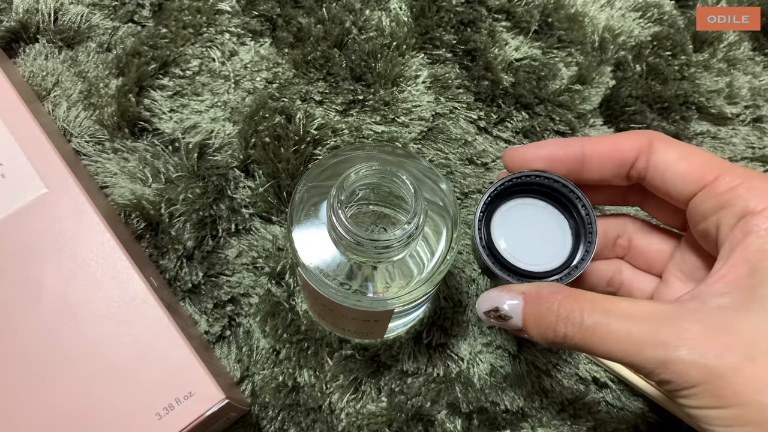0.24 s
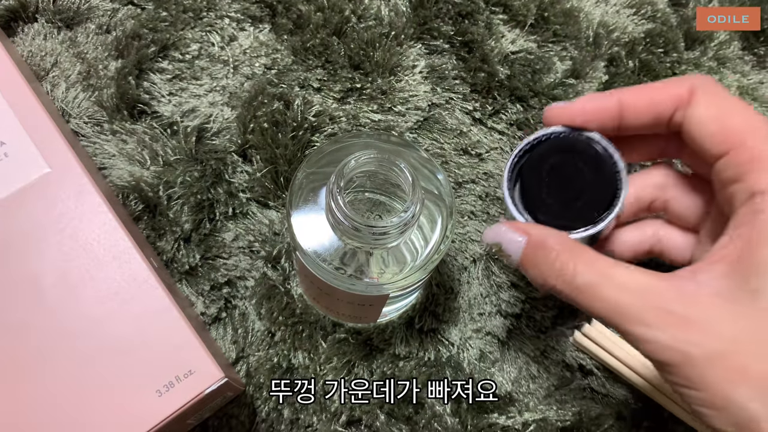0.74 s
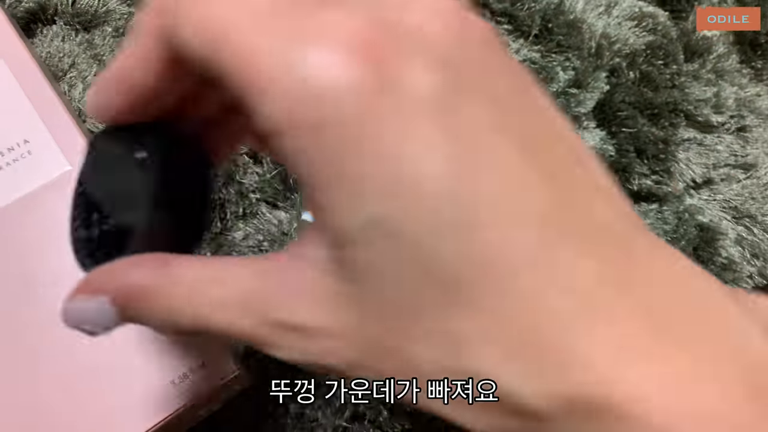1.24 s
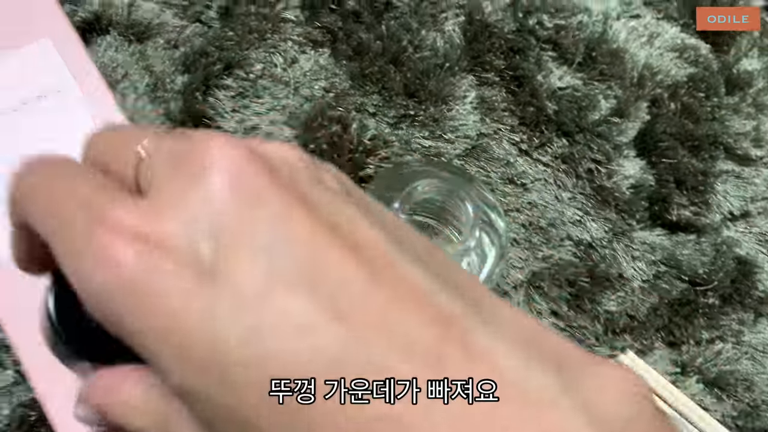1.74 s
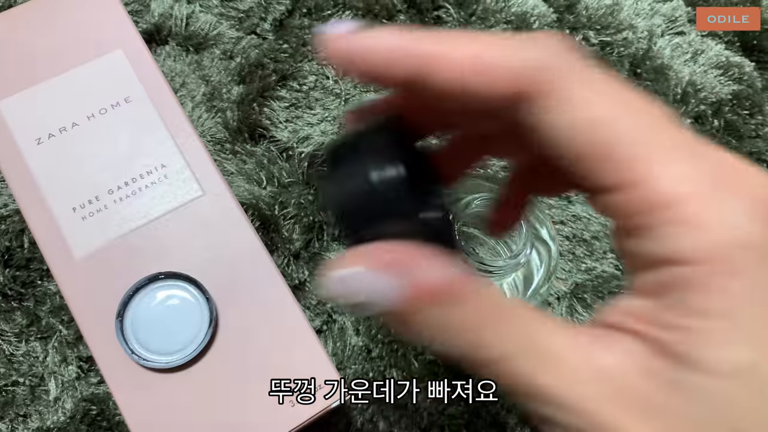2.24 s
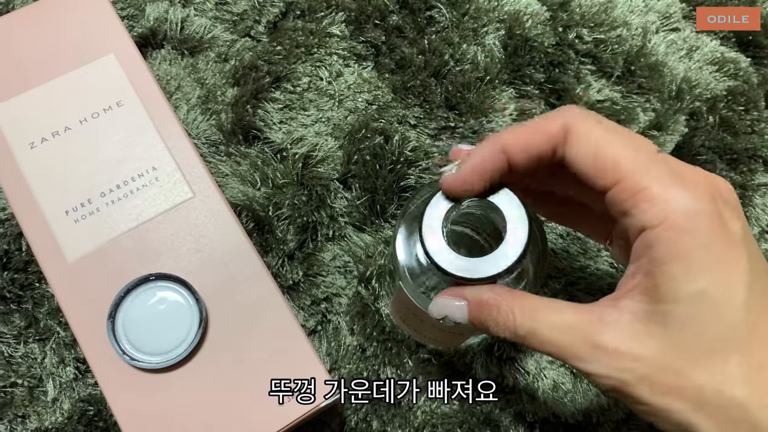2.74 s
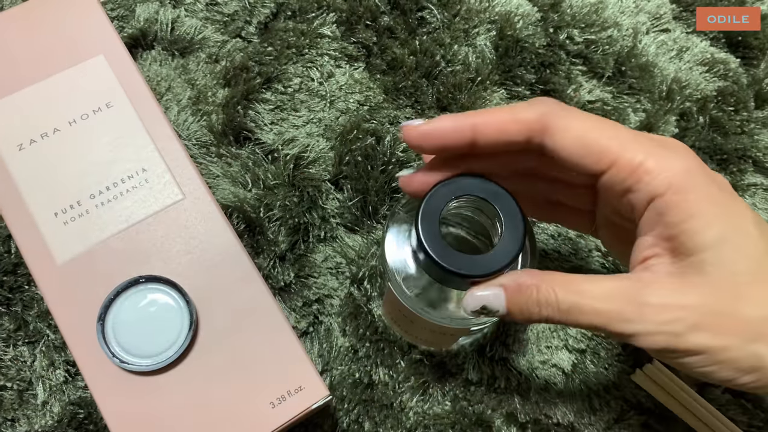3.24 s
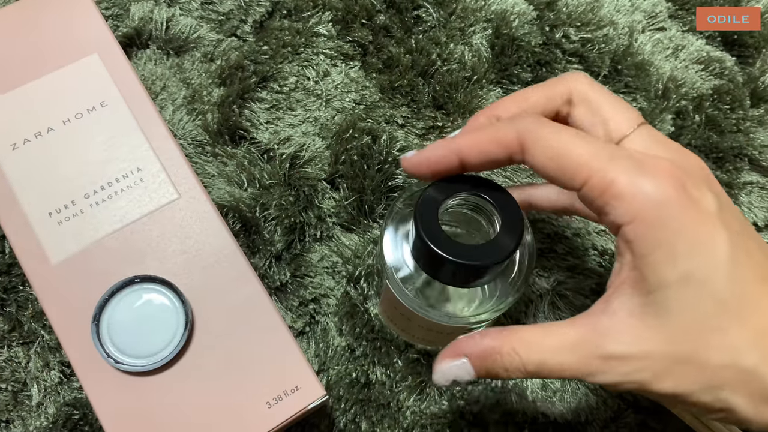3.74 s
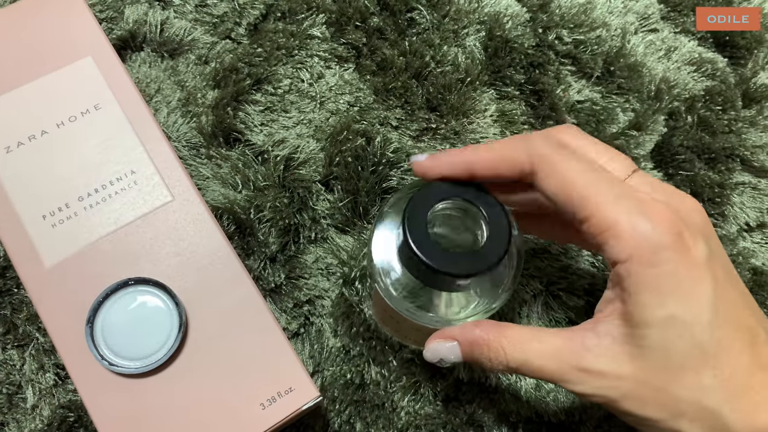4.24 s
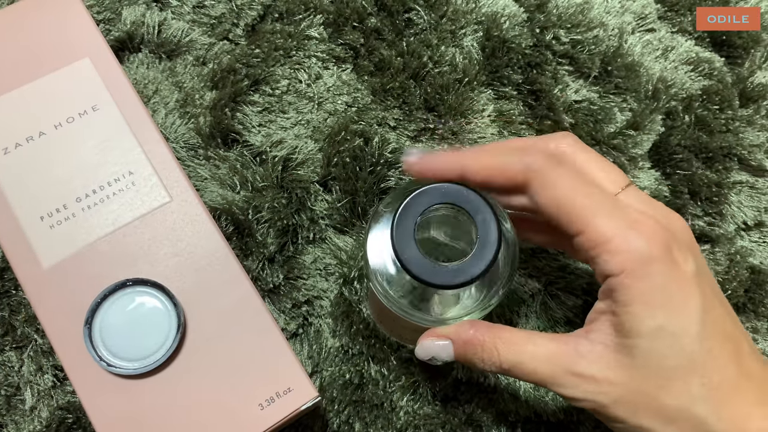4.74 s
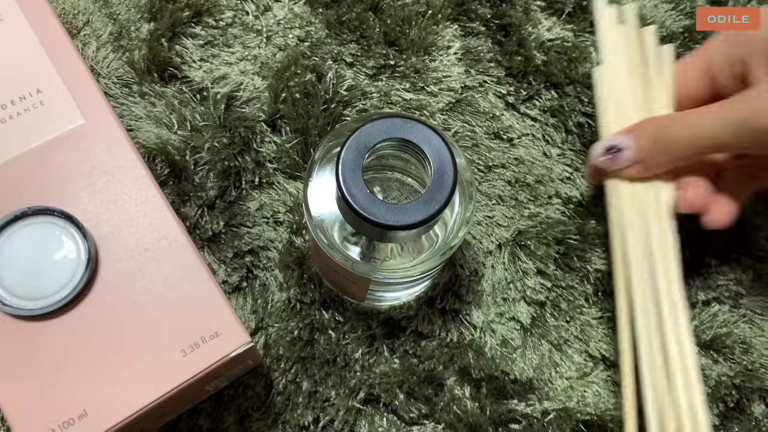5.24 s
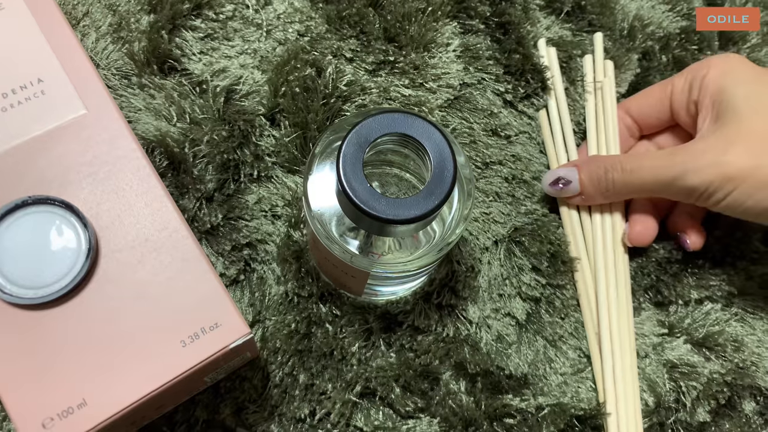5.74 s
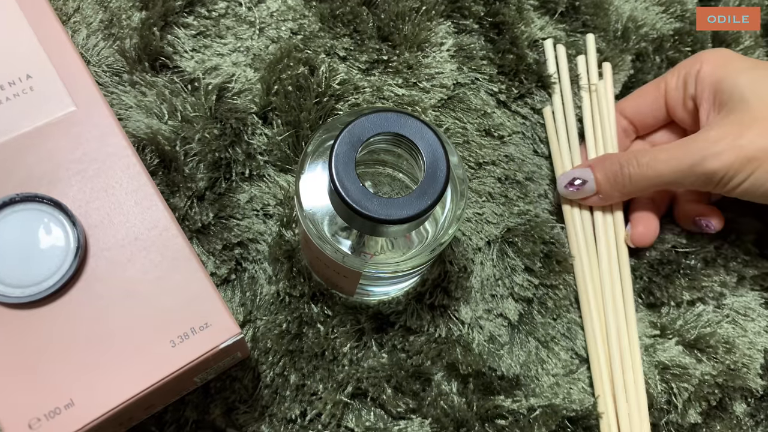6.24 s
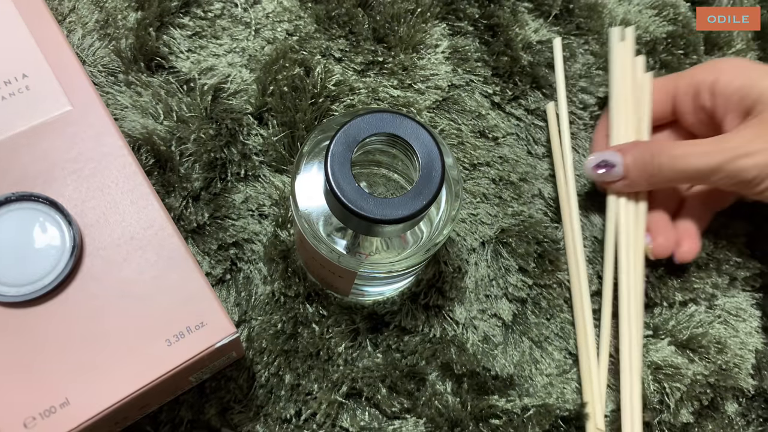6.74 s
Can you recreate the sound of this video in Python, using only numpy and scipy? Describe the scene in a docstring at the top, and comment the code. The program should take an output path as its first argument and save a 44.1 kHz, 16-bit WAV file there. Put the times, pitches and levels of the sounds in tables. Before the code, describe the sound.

Close plastic snaps, a scrape on a cardboard box, a plastic ring tapping and clinking on glass, then wooden sticks rustling faintly on a rug.

```python
"""Two sharp double snaps of a plastic cap, close to a pair of microphones in a small, quiet room.
A hand presses the cap onto a cardboard box, which knocks and rasps, then sets its ring on a filled
glass bottle: it thumps the air in the neck, slides and makes the glass clink. Last, thin wooden sticks
tick and rub as they are rolled together on a deep rug. Room air and a low mains hum lie underneath."""
import sys
import numpy as np
from scipy import signal
from scipy.fft import rfft, irfft
from scipy.io import wavfile
from scipy.ndimage import uniform_filter1d

SR = 44100
rng = np.random.default_rng(int(sys.argv[2]) if len(sys.argv) > 2 else 0)


def store_wav(level_fs):
    """Save 16-bit WAV to argv[1]."""
    pcm = np.round(np.clip(np.atleast_2d(level_fs), -1, 1) * 32767)
    wavfile.write(sys.argv[1], SR, pcm.T.astype(np.int16))


N = 308700

# modes of the plastic cap: (pitch [Hz], level [dB], t60 [s])
CAP_MODES = [(1340, 3.5, 0.0044), (2600, -10.5, .008), (4243, 4.5, 0.003), (6250, 0, 0.006),
             (7740, -13.5, 0.0023), (10800, -23, 0.0064), (13200, -42.5, 0.0033)]


def amp(db):
    """Decibels to gain."""
    return 10 ** (np.asarray(db) / 20)


def rms_one(x):
    """Scale to unit power."""
    return x / np.sqrt(np.mean(x ** 2) + 1e-20)


def band(x, low_hz, high_hz):
    """Band-pass with gentle slopes."""
    edges_hz = [low_hz, min(high_hz, .45 * SR)]
    return signal.sosfilt(signal.butter(2, edges_hz, "band", fs=SR, output="sos"), x)


def add(out, s, sound):
    """Mix a sound in at s seconds."""
    i = round(s * SR)
    out[i:i + len(sound)] += sound[:N - i]


def gain_curve(rows, column):
    """Smooth gain from a table of times and levels; silent outside it."""
    rows = np.array(rows)
    db = np.interp(np.arange(N) / SR, rows[:, 0], rows[:, column], left=-200, right=-200)
    return uniform_filter1d(amp(db), size=200)


def strokes(rows, column):
    """Gain of hand strokes: each climbs 30 dB over its swell time and drops 30 dB over its fade time."""
    t, out = np.arange(N) / SR, np.zeros(N)
    for row in rows:
        s, swell_s, fade_s = row[:3]
        near = slice(max(int((s - 2 * swell_s) * SR), 0), int((s + 2 * fade_s) * SR))
        away = np.maximum((s - t[near]) / swell_s, (t[near] - s) / fade_s)
        out[near] += amp(row[column] - 30 * away ** 1.16)   # the power rounds the top
    return out


def mode(hz, db, t60, rise_s, pressed=0.0):
    """A struck mode swells during the contact, then dies, ever faster if something presses on it."""
    t60 = max(t60, .003)
    t = np.arange(int(min(t60, .4) * SR)) / SR
    age = t / t60
    decay = amp(db - 60 * ((1.5 - pressed) * age + pressed * age ** 2))
    return decay * -np.expm1(-t / rise_s) * np.sin(2 * np.pi * hz * t)


def crack(db, t60, low_hz, high_hz):
    """The contact itself: a burst of noise peaking at db."""
    t = np.arange(900) / SR
    burst = band(rng.standard_normal(len(t)) * amp(-60 * t / t60), low_hz, high_hz)
    return amp(db) * burst / np.abs(burst).max()


def slips(per_s, spread_db):
    """Friction: random slips of uneven size, at unit power."""
    sizes = amp(spread_db * np.minimum(rng.exponential(1, N), 4)) * rng.choice([-1, 1], N)
    return rms_one(sizes * (rng.random(N) < per_s / SR) + 1e-9)


def rubbed(friction, modes, t60_scale=1):
    """Friction keeps a body's modes ringing; unit power."""
    out = 0
    for k, (hz, db, t60) in enumerate(modes):
        r = amp(-60 / (t60 * t60_scale * SR))
        gain = (1 - r * r) / 2
        feedback = [1, -2 * r * np.cos(2 * np.pi * hz / SR), r * r]
        out += (-1) ** k * amp(db) * signal.lfilter([gain, 0, -gain], feedback, friction)
    return rms_one(out)


def mic_pair(pan_db, lead_ms):
    """Left and right responses: the lows are steered by level and lead, the treble by spacing alone."""
    steer_hz, spacing_ms = 2640, .2137   # the treble reaches the left microphone later
    hz = np.fft.rfftfreq(N, 1 / SR)
    low = 1 / (1 + (hz / steer_hz) ** 6)
    low_turns = hz * lead_ms / 1000
    high_turns = 1 - hz * spacing_ms / 1000   # the lag joins one whole turn ahead
    phase = 2 * np.pi * (low_turns * low + high_turns * (1 - low))
    left = amp(pan_db / 2 * low * hz / (hz + 300)) * np.exp(.5j * phase)
    return np.array([left, 1 / left])


def placed(x, pan_db, lead_ms):
    """A close source at both microphones; positive values favour the left."""
    return irfft(rfft(x) * mic_pair(pan_db, lead_ms), N)


def room_air():
    """Steady room noise, nearly alike at both microphones in the bass and top, wide between."""
    # likeness of left and right: (frequency [Hz], likeness [0..1])
    likeness = [(60, .95), (180, .95), (550, .35), (2000, .2), (5000, .4), (7500, .5), (12000, .93)]
    # spectrum of the air: (frequency [Hz], relative density [dB])
    spectrum = [(30, -26.5), (45, -4.5), (90, -7), (160, -9.5), (250, -8.5), (340, -21.5), (500, -26),
                (1500, -38), (3000, -42), (6800, -45.5), (8800, -42.5), (11800, -46), (14000, -44),
                (16300, -68)]
    log_hz = np.log(np.fft.rfftfreq(N, 1 / SR) + 1)
    alike, shape_db = (np.interp(log_hz, np.log(hz), values)
                       for hz, values in (np.transpose(likeness), np.transpose(spectrum)))
    mid, side = rfft(rng.standard_normal((2, N))) * amp(shape_db)
    stereo = np.sqrt(1 + alike) * mid * mic_pair(0, 0) + np.sqrt(1 - alike) * side * [[1], [-1]]
    return amp(-63.5) * rms_one(irfft(stereo, N))


def mains_hum():
    """Two low tones, dead centre, each wavering with a narrow band of noise."""
    # hum lines: (pitch [Hz], rms level of the tone [dB])
    lines = [(59.5, -75.5), (119, -70.5)]
    t, out = np.arange(N) / SR, np.zeros(N)
    for hz, db in lines:
        waver = rms_one(band(rng.standard_normal(N), hz - 3, hz + 10))
        out += amp(db) * (np.sqrt(2) * np.sin(2 * np.pi * hz * t) + 0.95 * waver)
    return out


def reflections(x):
    """The small room returns a dull ceiling echo and a short tail, alike on both sides in the treble."""
    t60, tail_db, split_hz, wall_hz = 0.16, -16, 5400, 13000
    ceiling_s, ceiling_db, ceiling_hz = .0125, -18.5, 1790
    t = np.arange(int(.35 * SR)) / SR
    noise = rng.standard_normal((3, len(t)))
    wide_lows = band(band(noise[:2], 100, split_hz), 100, split_hz)
    tail = wide_lows + amp(-11) * band(noise[2], split_hz, wall_hz)
    tail *= amp(-60 * t / t60) * -np.expm1(-t / 0.0013)
    tail *= amp(tail_db) / np.sqrt(np.sum(tail ** 2, axis=1, keepdims=True))
    echo = amp(ceiling_db) * signal.unit_impulse(len(t), round(ceiling_s * SR))
    tail += signal.sosfilt(signal.butter(2, ceiling_hz, fs=SR, output="sos"), echo)
    return signal.fftconvolve(x, tail, axes=1)[:, :N]


def sticks_on_rug():
    """Rolling sticks tap and rub each other while the rug fibres hiss."""
    # stick meets stick: (time [s], level [dB], treble peak [dB], pitch [Hz])
    ticks = [(5.1778, -63.5, -70, 1540), (5.2538, -76, -58, 1440), (5.3782, -61.5, -66, 2160),
             (5.3946, -58, -75, 1810), (5.453, -74, -58, 1547), (5.6106, -63.5, -72.5, 2400),
             (5.6728, -55.5, -58, 2510), (5.8676, -45, -54.5, 2460), (5.9349, -59, -69, 1767),
             (6.0043, -50.5, -56.5, 2420), (6.01, -51.5, -54.5, 2400), (6.0358, -54, -68, 2350),
             (6.2133, -59.5, -55, 2380), (6.4284, -61, -57.5, 1740), (6.4658, -60.5, -54.5, 1420),
             (6.557, -60.5, -67.5, 1624), (6.7044, -56, -65, 1756), (6.714, -48.5, -49, 1720),
             (6.7563, -55.5, -56, 1450), (6.8034, -55, -63, 3360)]
    # hand and sticks brush the rug: (time [s], swell [s], fade [s], wood level [dB], fibre level [dB])
    brushes = [(.44, .02, 0.018, -78.5, -79), (.978, .05, 0.11, -92, -76), (1.056, 0.011, 0.13, -92, -72.5),
               (1.3, 0.25, 0.097, -85, -74), (1.388, .03, .04, -78.5, -78), (1.43, 0.072, 0.11, -86, -75.5),
               (2.552, 0.015, 0.021, -72.5, -90), (2.63, 0.18, 0.16, -97, -71),
               (2.682, 0.026, 0.0079, -83, -89), (2.79, 0.03, 0.049, -80.5, -74.5),
               (4.03, .06, .1, -100, -88), (4.28, .06, 0.11, -89.5, -75), (4.53, 0.051, 0.11, -94.5, -75),
               (4.84, 0.22, .12, -98, -78.5), (5.394, 0.046, .1, -79.5, -81.5),
               (5.62, 0.29, .1, -79.5, -76.5), (5.67, 0.036, .05, -68, -64),
               (5.87, 0.018, .04, -65.5, -75.5), (6.008, .025, 0.13, -73, -71),
               (6.218, 0.018, 0.067, -80, -74.5), (6.45, 0.24, .25, -80, -76.5),
               (6.57, 0.13, .04, -76.5, -84), (6.73, .11, 0.28, -76.5, -72.5),
               (6.81, .12, 0.026, -79.5, -76), (6.92, 0.09, .2, -89.5, -76), (7.0, .03, .03, -83, -69)]
    # modes of thin wood: (pitch [Hz], level [dB], t60 before scaling [s])
    wood_modes = [(1546, 8, 0.018), (2500, 1, 0.01), (3350, 1.5, 0.013), (4500, -28, 0.043),
                  (5600, -7.5, 0.0053)]
    out, rolling = np.zeros(N), strokes(brushes, column=3)
    # lighter taps fall at random, following the rubbing in level and the nearby ticks in pitch
    tick_s, _, _, tick_hz = np.transpose(ticks)
    when, softness, detune = rng.random((140, 3)).T
    light_s = tick_s[0] + when * (N / SR - tick_s[0])
    light_db = 20 * np.log10(rolling[(light_s * SR).astype(int)] + 1e-6) + 13.5 - 12 * softness
    light_hz = np.interp(light_s, tick_s, tick_hz) * (1 + .2 * (detune - .5))
    for s, db, treble_db, hz in [*ticks, *zip(light_s, light_db, light_db - 3.5, light_hz)]:
        add(out, s, crack(db - 13, t60=0.0013, low_hz=1500, high_hz=6200))
        add(out, s, crack(treble_db, t60=0.014, low_hz=8000, high_hz=16600))
        for ratio in (1, 1.045, 2.05):   # both sticks ring, and an overtone
            add(out, s, mode(hz * ratio, db + 3 - 10.5 * ratio, t60=0.036, rise_s=0.0004))
    rub = rubbed(slips(per_s=2000, spread_db=4.5), wood_modes, t60_scale=0.6)
    rub += amp(-10) * rms_one(band(slips(per_s=1500, spread_db=5.5), 2500, 7000))
    fibres = rms_one(band(slips(per_s=5000, spread_db=-0.5), 5000, 21000))
    return out + rolling * rub + strokes(brushes, column=4) * fibres


def cap_on_box():
    """The cap's knocks and gritty drag drive a cardboard panel."""
    # knocks: (time [s], crack peak [dB], treble peak [dB], low modes [dB], high modes [dB])
    knocks = [(1.482, -38, -45, -41.5, -34), (1.5264, -50, -62, -49.5, -62.5),
              (1.5434, -34.5, -69, -44, -42), (1.571, -23, -21.5, -23.5, -16), (1.583, -40, -35, -29, -55),
              (1.6596, -38, -63, -34, -30.5), (1.684, -36.5, -56, -32.5, -27.5),
              (1.6914, -28.5, -37, -45, -32), (1.7034, -33, -44, -40, -48), (1.7104, -44, -45, -33.5, -27),
              (1.7264, -44, -57, -40.5, -47), (1.741, -46, -60, -42, -55), (1.7604, -35, -35, -30.5, -25.5),
              (1.7779, -35, -44, -40.5, -52), (1.786, -37, -45, -32.5, -45),
              (1.792, -57, -39.5, -34.5, -26), (1.7955, -31, -38, -27, -31.5),
              (1.803, -37, -44, -34.5, -35), (1.8294, -54, -72, -50, -69), (1.9044, -78, -83, -59.5, -53.5),
              (1.9344, -68, -76, -61, -57)]
    # modes of the panel: (pitch [Hz], level [dB], t60 when struck [s])
    board_modes = [(308, -11.5, 0.037), (430, 5, 0.038), (597, 0, 0.05), (683, 0.5, 0.046),
                   (864, -8, 0.019), (1150, 0.5, 0.023), (1166, -3, 0.018)]
    # cap pressed and dragged along: (time [s], board level [dB], grit level [dB])
    drag = [(1.2, -69, -109.5), (1.54, -76.5, -79), (1.656, -54.5, -69.5), (1.696, -38, -55),
            (1.82, -79, -69.5), (1.904, -68, -100), (2.0, -97, -95)]
    out = np.zeros(N)
    for s, crack_db, treble_db, low_db, high_db in knocks:
        add(out, s, crack(crack_db, t60=0.018, low_hz=1980, high_hz=4260))
        for (hz, mode_db, t60), stray_db in zip(CAP_MODES[1:4], rng.normal(0, 3, 3)):
            add(out, s, mode(hz, crack_db + mode_db - 7 + stray_db, 0.4 * t60, rise_s=.0002))
        add(out, s, crack(treble_db, t60=0.0099, low_hz=5980, high_hz=11600))
        for hz, mode_db, t60 in board_modes:
            detune, stray_db = rng.normal(0, 0.098), rng.normal(0, 2)
            level_db = (low_db if hz < 900 else high_db) + mode_db + stray_db
            add(out, s, mode(hz * (1 + detune), level_db, t60, rise_s=0.00074))
    grit = slips(per_s=4400, spread_db=5)
    board = gain_curve(drag, column=1) * rubbed(grit, board_modes, t60_scale=0.53)
    rasp = gain_curve(drag, column=2) * rms_one(band(grit, 2000, 10000))
    return out + board + rasp


def cap_snaps():
    """Each snap is a bright burst plus the short modes of the plastic."""
    # snaps, in two quick pairs: (time [s], level [dB])
    snaps = [(0.0227, -32.5), (0.0259, -22), (0.1887, -15), (0.1916, -19.5)]
    out = np.zeros(N)
    for s, db in snaps:
        add(out, s, crack(db - 2.5, t60=0.0076, low_hz=880, high_hz=15800))
        for hz, mode_db, t60 in CAP_MODES:
            add(out, s, mode(hz, db + mode_db - 5 + rng.normal(0, 0.82), t60, rise_s=0.00055))
    return out


def ring_on_bottle():
    """The plastic ring thumps the air in the neck, strikes two groups of glass modes and scuffs along."""
    # ring touches the neck: (time [s], crack peak [dB], neck air level [dB], neck air pitch [Hz])
    touches = [(2.827, -73, -59, 1510), (2.839, -62, -56, 1460), (2.865, -81, -54, 1440),
               (2.881, -59, -45, 1390), (2.888, -76, -49, 1410), (2.9053, -53, -32.5, 1454),
               (2.9608, -67, -48.5, 1300), (2.9828, -75, -46, 1390), (3.021, -77, -58, 1460),
               (3.0447, -64, -43.5, 1460), (3.0875, -51.5, -37.5, 1497), (3.159, -64, -43.5, 1440),
               (3.211, -69.5, -44, 1440), (3.233, -62, -51, 1400), (3.2506, -73, -47, 1430),
               (3.319, -60.5, -40, 1457), (3.447, -52.5, -37.5, 1380), (3.4504, -55, -41, 1500),
               (3.492, -82, -55, 1360), (3.5477, -51.5, -41.5, 1360), (3.5547, -49, -41.5, 1450),
               (3.6268, -35, -28.5, 1520), (3.64, -53, -27.5, 1460), (3.737, -51.5, -38, 1515),
               (3.779, -66.5, -53, 1443), (3.875, -63, -53.5, 1430), (3.8952, -60.5, -44, 1546),
               (3.901, -51, -49, 1550), (3.9116, -55, -42, 1516), (3.9579, -46.5, -51, 1600),
               (3.962, -58.5, -50, 1485), (4.1298, -75, -59.5, 1454), (4.2202, -37, -27.5, 1473),
               (4.362, -54.5, -53, 1651), (4.3694, -36, -30.5, 1496), (4.378, -48, -37, 1400),
               (4.384, -35, -54, 1530), (4.415, -42.5, -34.5, 1450), (4.9145, -42.5, -49, 1480),
               (4.9319, -26, -22, 1496), (4.951, -55, -34, 1550), (4.9635, -43, -39, 1330),
               (4.979, -61, -37, 1560), (4.987, -53, -40, 1510), (5.0666, -49.5, -38.5, 1495)]
    # clinks: (time [s], tick peak [dB], low group [dB], high group [dB], low group pitch [Hz], t60 [s])
    clinks = [(2.9052, -75, -70, -83, 7660, 0.23), (3.0876, -82, -65, -69, 7660, 0.14),
              (3.159, -78, -71, -74, 7660, 0.13), (3.233, -63, -69.5, -86, 7660, 0.091),
              (3.4465, -53, -63, -71, 7673, .067), (3.5568, -62, -49.5, -65, 7615, 0.23),
              (3.6271, -12.5, -17, -24.5, 7648, 0.23), (3.642, -51, -32, -54.5, 7659, 0.088),
              (3.7367, -54, -71, -56, 7660, 0.09), (3.9, -77, -84, -66, 7660, .15),
              (3.9113, -77, -55, -89, 7673, .16), (4.221, -62, -45, -46, 7655, 0.047),
              (4.3708, -57.5, -30.5, -46.5, 7695, .19), (4.3796, -37, -63.5, -67, 7716, 0.16),
              (4.385, -28, -64.5, -71.5, 7714, .17), (4.9157, -60, -39, -88, 7718, 0.13),
              (4.9324, -19, 1.5, -13, 7709, .071), (4.9514, -40, 0.5, -27, 7713, 0.077),
              (4.9625, -57, -44, -36, 7714, 0.15), (5.0648, -42, -39.5, -46.5, 7597, .16)]
    # low glass modes, whose pitch follows the liquid's tilt: (pitch [ratio], level [dB], t60 [ratio])
    low_glass = [(1.0, -5, 1.0), (1.016, -6, .15), (1.518, -25, .9)]
    # high glass modes: (pitch [Hz], level [dB], t60 [ratio])
    high_glass = [(8935, -2, .8), (9190, -10, .8), (10300, -20, .45), (10660, -18, .45), (11045, -18, .6),
                  (14990, -20, .65)]
    # ring slides on the glass: (time [s], swell [s], fade [s], scuff level [dB], finger grip [dB])
    scuffs = [(2.85, 0.044, 0.058, -90, -63), (3.64, 0.024, 0.057, -47.5, -70),
              (3.9, 0.05, 0.087, -64.5, -64.5), (3.958, .015, 0.022, -75, -66),
              (4.22, 0.02, 0.014, -68.5, -79), (4.378, 0.021, 0.053, -44.5, -62),
              (4.94, 0.045, 0.12, -57.5, -68.5)]
    # modes of the rubbed ring: (pitch [Hz], level [dB], t60 before scaling [s])
    ring_modes = [(1390, -2.5, 0.0087), (3070, -6.5, 0.0033), (4650, 1, 0.03), (9300, -11, 0.0031),
                  (10500, -11, .004)]
    out = np.zeros(N)
    for s, crack_db, neck_db, neck_hz in touches:
        top_hz = 2900 * amp(0.062 * (crack_db + 64) + rng.normal(0, 1))   # harder touches are brighter
        add(out, s, crack(crack_db, t60=0.0081, low_hz=1890, high_hz=top_hz))
        add(out, s, crack(crack_db - 20, t60=0.0088, low_hz=6280, high_hz=13200))
        add(out, s, mode(neck_hz, neck_db, t60=0.018, rise_s=.0012, pressed=.6))
        plastic_hz = 2700 * amp(rng.normal(0, 1.2))
        add(out, s, mode(plastic_hz, crack_db - 4, t60=0.009, rise_s=.0004))
        add(out, s, mode(4650, crack_db - 4, t60=0.0039, rise_s=.0003))
    for s, tick_db, low_db, high_db, pitch_hz, t60 in clinks:
        add(out, s, crack(tick_db, t60=0.007, low_hz=6500, high_hz=11320))
        for ratio, db, share in low_glass:
            add(out, s, mode(pitch_hz * ratio, low_db + db, share * t60, rise_s=.001, pressed=.95))
        for hz, db, share in high_glass:
            add(out, s, mode(hz, high_db + db, share * t60, rise_s=.0003, pressed=.6))
    grit = slips(per_s=1300, spread_db=2.5)
    glass_modes = [(7690, 0, .12)] + [(hz, db, .1 * share) for hz, db, share in high_glass]
    scuff = rubbed(grit, ring_modes, t60_scale=.3) + amp(-7.5) * rubbed(grit, glass_modes)
    grip = rms_one(band(rng.standard_normal(N), 250, 1400))
    return out + strokes(scuffs, column=3) * scuff + strokes(scuffs, column=4) * grip


def scene():
    """Close to the pair: cap and sticks near the centre, box and bottle to the left, the room behind."""
    close = placed(cap_snaps(), pan_db=2.8, lead_ms=-0.062)
    close += placed(cap_on_box(), pan_db=10.9, lead_ms=0.33)
    close += placed(ring_on_bottle(), pan_db=12, lead_ms=.09)
    close += placed(sticks_on_rug(), pan_db=1, lead_ms=-.05)
    thin_hz = 293   # small things on a rug send out little below this
    close = signal.sosfilt(signal.butter(2, thin_hz, "high", fs=SR, output="sos"), close)
    return close + reflections(close) + room_air() + mains_hum()


def record(dry):
    """A steep low-pass cuts the very top of both channels."""
    stop_hz = 16900
    return signal.sosfilt(signal.cheby2(12, 70, stop_hz, fs=SR, output="sos"), dry)


dry = scene()
out = record(dry)
store_wav(out)
```